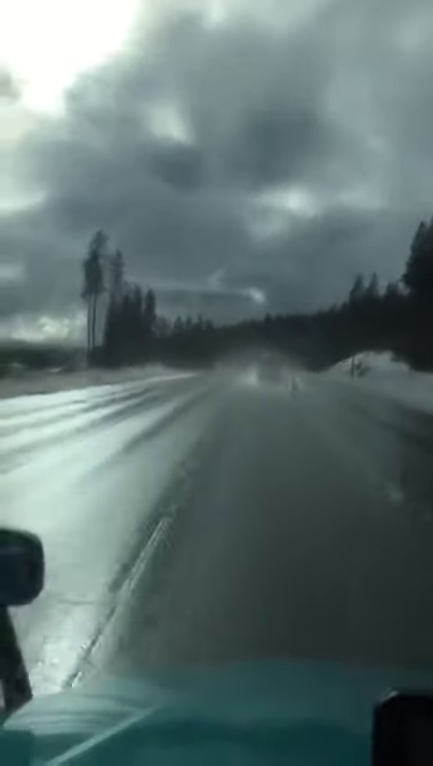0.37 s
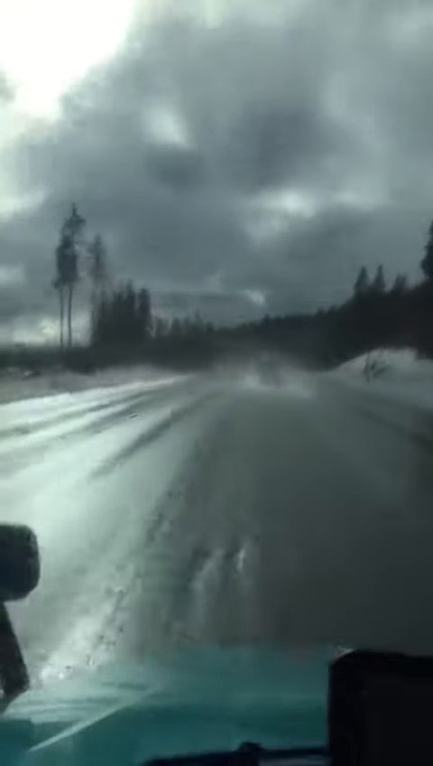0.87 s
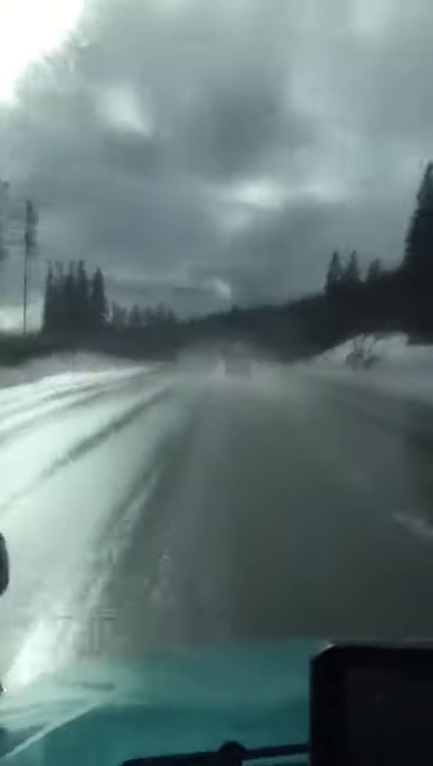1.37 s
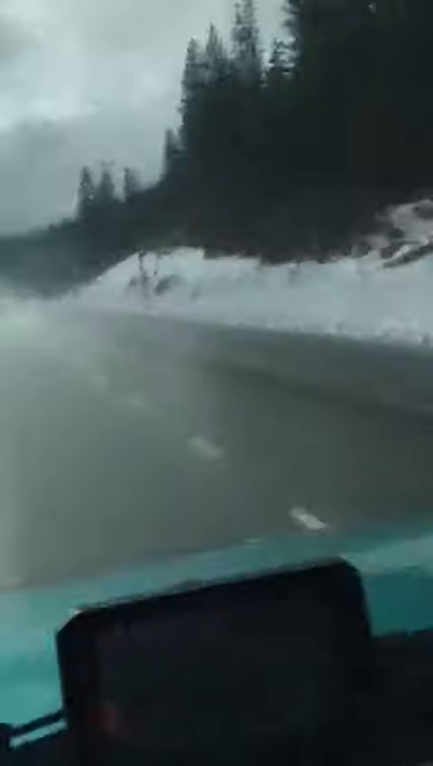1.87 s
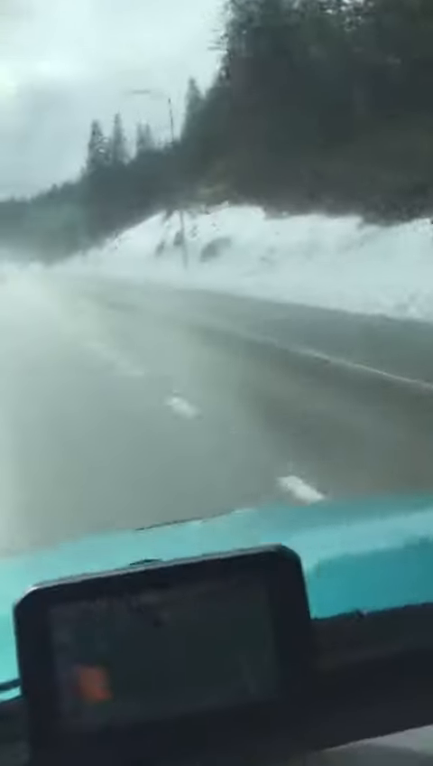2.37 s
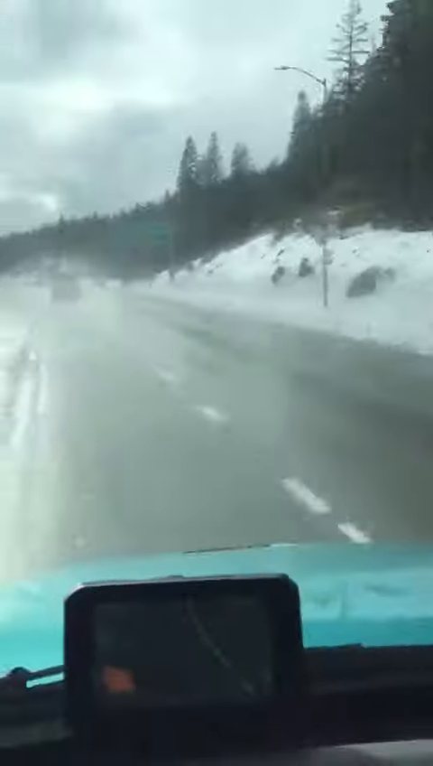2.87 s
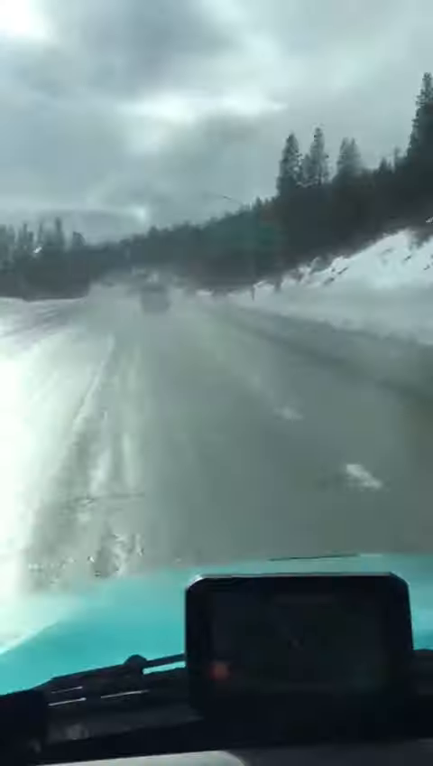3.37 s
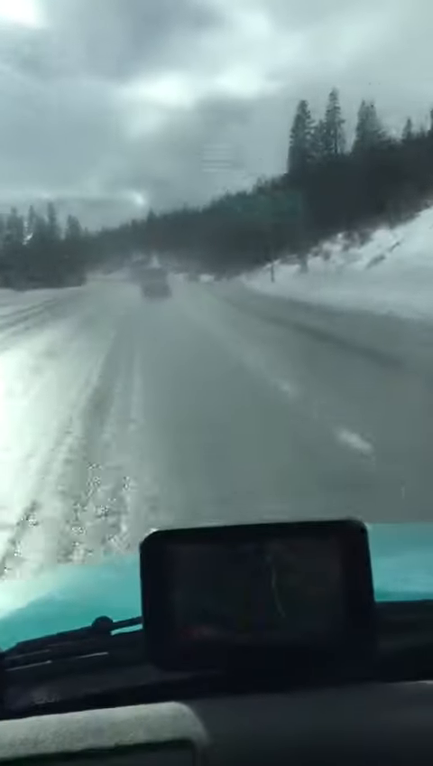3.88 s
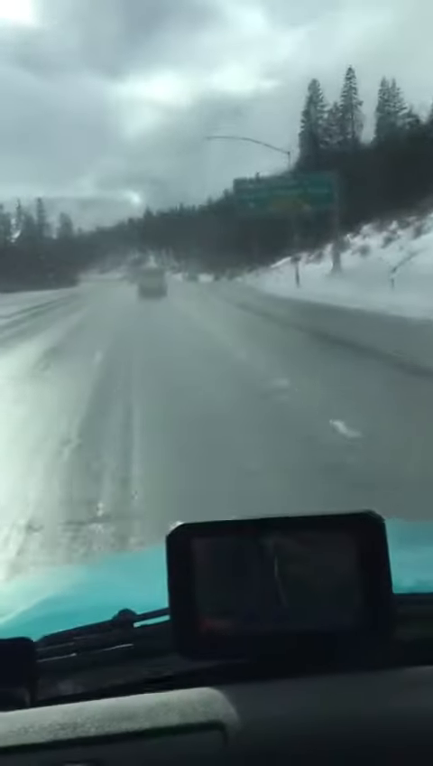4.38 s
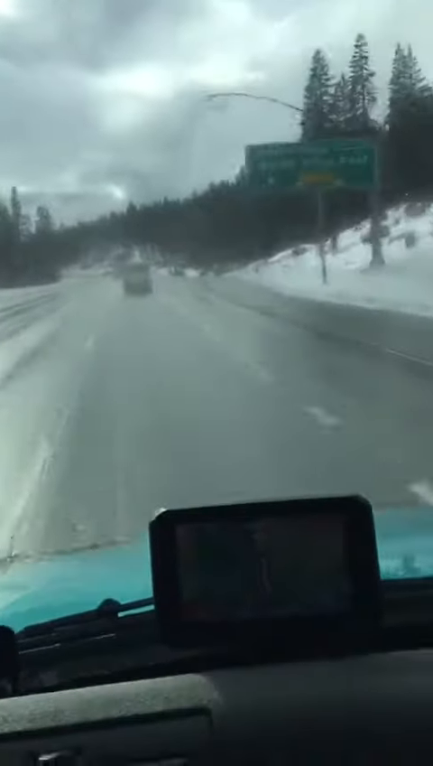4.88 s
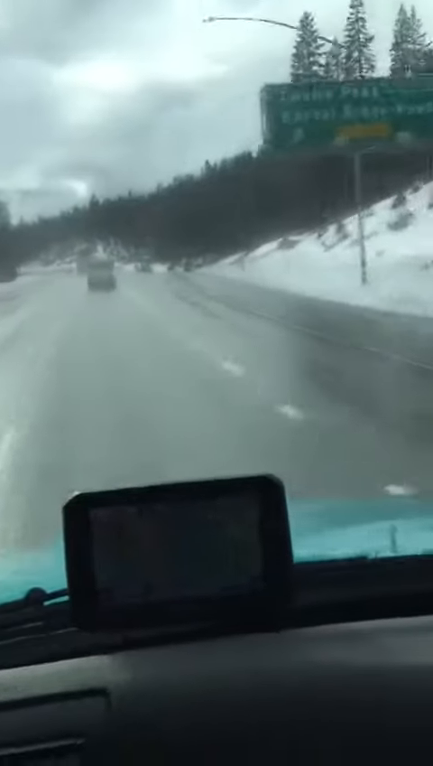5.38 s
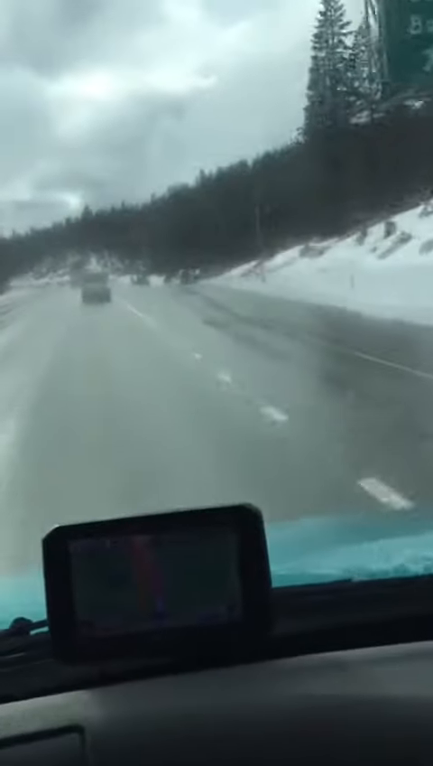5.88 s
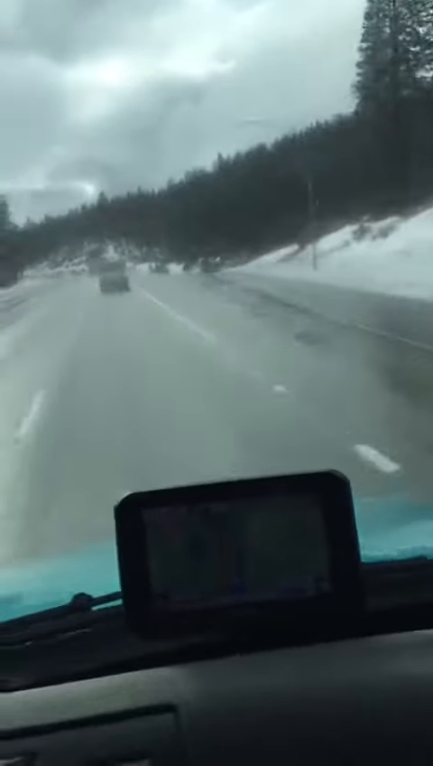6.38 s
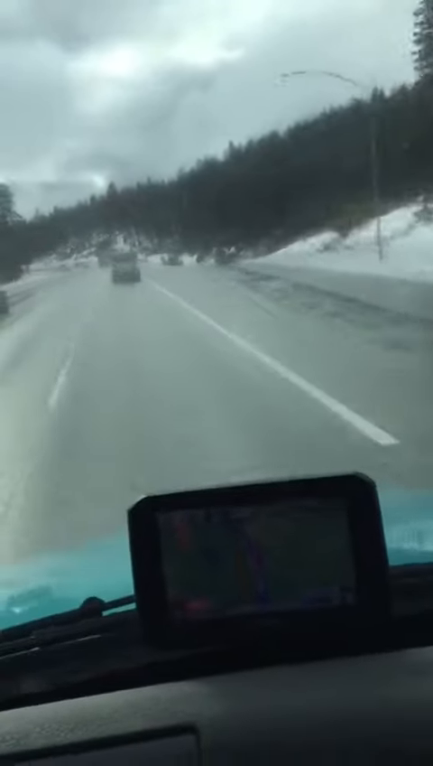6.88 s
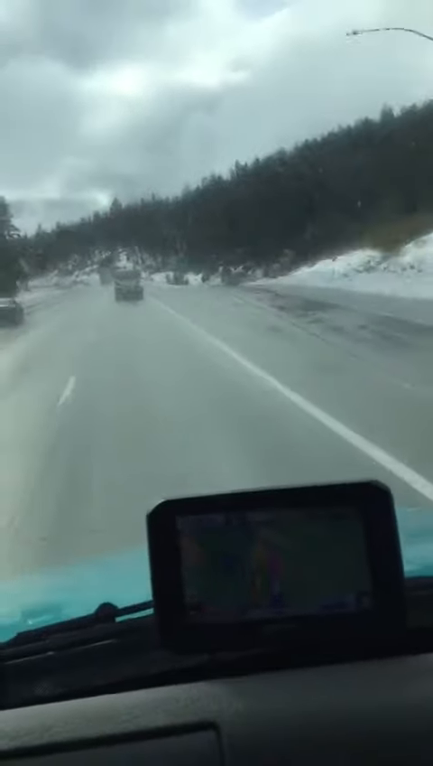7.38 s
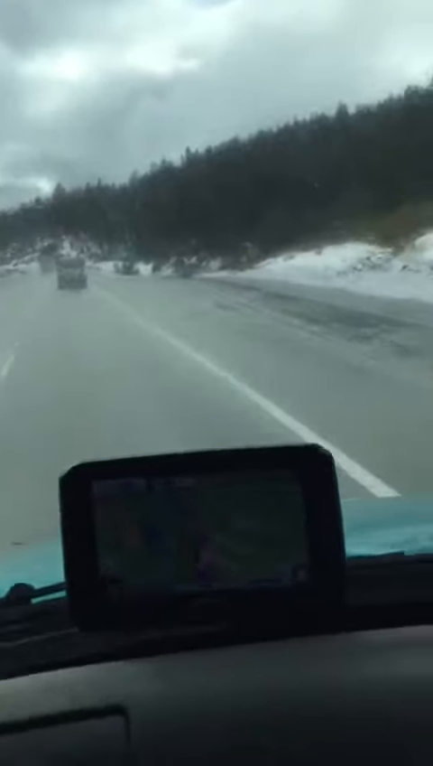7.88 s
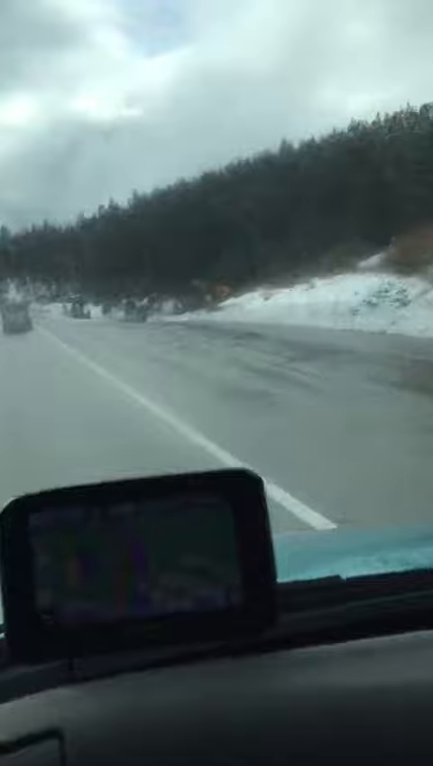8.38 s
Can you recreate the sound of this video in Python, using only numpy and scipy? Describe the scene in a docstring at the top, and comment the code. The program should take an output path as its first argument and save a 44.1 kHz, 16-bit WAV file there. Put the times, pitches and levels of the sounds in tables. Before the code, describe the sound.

Continuous cab noise while driving: deep air boom, panel rumble, floor drone and wet tyre roar, with low engine tones underneath. Light slush hisses and droplets speckle the treble. A sudden wash of spray comes first, then a rougher stretch with thumps, clicks and tiny metal rings, then a smoother one with faint tyre song and gear whine before the growl returns. Enclosed and dry, picked up in mono by a phone near the dashboard.

```python
"""Inside a truck cab on a wet highway: filtered noise booms and roars throughout, under wavering sine tones
from engine, tyres and a faint turbo; noise cracks tick in the trim and short sine grains speckle the treble.
A boom swell and a burst of slush pass at about 1.6 s. Near 4 s coarse asphalt growls, bumps swell the boom,
dull thuds come through the floor and metal parts ping as decaying sines.
After 6 s the growl sinks and the tyres sing, a gear whine rises at 7 s, and the growl returns at the end."""
import sys
import numpy as np
from scipy import signal
from scipy.fft import rfft, irfft, next_fast_len
from scipy.io import wavfile
from scipy.ndimage import uniform_filter1d, map_coordinates

SR = 44100
rng = np.random.default_rng(int(sys.argv[2]) if len(sys.argv) > 2 else 0)


def makeup_ratio(level_db):
    """Linear amplitude ratio for a level in decibels (20 dB per factor of ten)."""
    decades = np.asarray(level_db, float) / 20
    return 10 ** decades


def waveform_to_disk(signal):
    """Save audio, clipped to [-1, 1], as 16-bit WAV at the path in sys.argv[1]."""
    frames = np.transpose(np.atleast_2d(signal))
    scaled = np.clip(frames, -1, 1) * 32767
    samples = np.round(scaled).astype(np.int16)
    wavfile.write(sys.argv[1], SR, samples)


N = 385434

# slush thrown up by the wheels: t/s, spray level/dB
SPRAY_LEVEL = [(0, -49), (.7, -49), (.95, -46), (1.1, -50), (1.49, -45.5), (1.57, -34.5), (1.76, -36.5),
               (1.79, -44.5), (2.2, -45), (2.5, -48), (3.4, -49), (3.74, -47.5), (3.81, -41), (4.2, -45.5),
               (4.65, -41.5), (5.05, -45), (5.3, -49), (5.9, -49.5), (6.1, -44.5), (6.4, -50), (7.3, -48),
               (8.2, -49), (8.74, -47.5)]


def unit(x):
    """Scales x to rms 1."""
    return x / np.sqrt(np.mean(x ** 2) + 1e-20)


def curves(rows):
    """Draws one value per sample for each column after the time."""
    s, *columns = np.transpose(rows)
    t = np.arange(N) / SR
    return [np.interp(t, s, column) for column in columns]


def wobble(rate):
    """A smooth random curve with rate knots a second."""
    knots = rng.standard_normal(int(N * rate / SR) + 4)
    return map_coordinates(knots, [np.arange(N) * rate / SR])


def coloured(x, spectrum):
    """Filters x by a gain curve of (Hz, dB) points joined on a log frequency axis."""
    m = next_fast_len(N + 8192)
    hz, db = np.transpose(spectrum)
    bins = np.fft.rfftfreq(m, 1 / SR)
    gain = makeup_ratio(np.interp(np.log(bins + 1), np.log(hz + 1), db))
    return irfft(rfft(x, m) * gain, m)[..., :N]


def hiss(spectrum):
    """Smooth coloured noise of rms 1."""
    return unit(coloured(rng.standard_normal(N), spectrum))


def rush(spectrum, patchy_db):
    """Coloured noise of rms 1 whose gain varies in random patches of time and frequency."""
    z = signal.stft(rng.standard_normal(N), nperseg=512)[2]
    across_bins = uniform_filter1d(rng.standard_normal(z.shape), size=6, axis=0)
    patches = unit(uniform_filter1d(across_bins, size=12, axis=1))
    noise = signal.istft(z * makeup_ratio(patchy_db * patches), nperseg=512)[1][:N]
    return unit(coloured(noise, spectrum))


def tone(rows, waver_hz, flutter_db, rate):
    """A sine on a (s, Hz, rms dB) track, unsteady in pitch and level."""
    hz, db = curves(rows)
    phase = 2 * np.pi * np.cumsum(hz + waver_hz * wobble(rate)) / SR
    return np.sqrt(2) * makeup_ratio(db + flutter_db * wobble(rate)) * np.sin(phase)


def add(track, s, sound):
    """Mixes a short sound in at s seconds."""
    part = track[round(s * SR):][:len(sound)]
    part += sound[:len(part)]


def sine_grains(count=3000):
    """Short sine grains at random times and pitches, weaker toward the treble, louder with the spray."""
    when, pitch, size, life = rng.random((count, 4)).T
    start = (when * N).astype(int)
    hz = 1100 * (9500 / 1100) ** pitch
    spray_db = np.minimum(curves(SPRAY_LEVEL)[0][start], -41)
    db = spray_db - 8 - 6.5 * np.log2(hz / 2500) + 9 * size
    t = np.arange(SR // 30) / SR
    rise_s = 0.002 + 0.003 * life[:, None]
    envelope = t / rise_s * np.exp(1 - t / rise_s)  # peaks at 1 after rise_s
    grains = makeup_ratio(db)[:, None] * envelope * np.sin(2 * np.pi * hz[:, None] * t)
    places = start[:, None] + np.arange(len(t))
    return np.bincount(places.ravel(), grains.ravel())[:N]


def pings():
    """Small metal parts ring, each a decaying sine with a soft start."""
    # struck parts: t/s, level/dB, f/Hz
    struck = [(1.394, -31, 3000), (1.396, -44, 6600), (1.47, -49, 9400), (2.698, -49, 10000),
              (2.843, -45, 9900), (3.788, -29, 2440), (3.858, -37, 2900), (3.862, -31, 3190),
              (3.858, -37, 4370), (4.52, -37, 4150), (4.569, -26, 2410), (4.666, -30, 2450),
              (4.676, -32, 3250), (7.237, -36, 3930), (8.48, -36, 2910), (8.61, -39, 3000)]
    t60_s, rise_s = 0.075, 0.0018
    out, t = np.zeros(N), np.arange(SR // 4) / SR
    for s, db, hz in struck:
        envelope = makeup_ratio(db - 60 * t / t60_s) * (1 - np.exp(-t / rise_s))
        add(out, s, envelope * np.sin(2 * np.pi * hz * t))
    return out


def ticks(count=24):
    """Loose trim ticks: a short crack and a burst of noise dying in the cab, coloured by a duller knock."""
    # trim ticks: t/s, burst level/dB, knock level over the burst/dB
    placed = [(.1026, -35, -17), (.612, -47, 8), (.72, -45.5, 7), (.814, -47, -4), (.845, -36.5, -9),
              (1.3259, -42, -5), (1.393, -39.5, -8), (1.4686, -47, -7), (1.5658, -34, -5), (1.7993, -49, 0),
              (1.8981, -50, -10), (2.4054, -39, -18), (2.4943, -44.5, 7), (3.0619, -47, -11),
              (3.5843, -46, 0), (3.6576, -45, -5), (3.7883, -43, 3), (3.8535, -48.5, 16), (4.106, -41, 7.5),
              (4.2847, -45, 9), (4.305, -47, 9), (4.441, -39, 5), (4.4812, -43, 1), (4.5715, -50, 7),
              (4.6643, -37, -5), (4.7765, -46, -11), (4.8539, -42, 6), (5.0095, -44, 4), (5.1936, -50.5, 9),
              (5.657, -50, 5), (5.7843, -47, 5), (6.0816, -39.5, -8), (6.3345, -45, -1),
              (6.6079, -41.5, -3), (6.8538, -43, -11.5), (7.8082, -48, 6), (7.8695, -45, -5),
              (8.2177, -39.5, -8), (8.4791, -43, 6.5), (8.6103, -48, 3)]
    # colour of crack and burst: f/Hz, relative gain/dB
    snap_colour = [(400, -23.5), (1500, -10), (3000, 3.5), (5000, 2.5), (7000, 2.5), (9500, -3.5),
                   (12000, -12.5)]
    # colour of the knock: f/Hz, relative gain/dB
    knock_colour = [(700, -42.5), (1500, 6), (3000, 4), (4300, 1), (6000, -38)]
    t60_s, rise_s = 0.12, 0.0033
    crack_t60_s, crack_db = 0.0083, 4  # crack level is over the burst
    snap, knock, t = np.zeros(N), np.zeros(N), np.arange(SR // 4) / SR
    when, size, dull = rng.random((count, 3)).T
    faint_db = -50.5 - 4 * (2 * size - 1)
    faint = zip(when * N / SR, faint_db, 16 * dull - 6)  # small ticks that fall by chance
    fade = makeup_ratio(-60 * t / t60_s) * (1 - np.exp(-t / rise_s))
    crack = makeup_ratio(crack_db - 60 * t / crack_t60_s)
    for s, db, knock_db in [*placed, *faint]:
        add(snap, s, makeup_ratio(db) * (fade + crack))
        add(knock, s, makeup_ratio(db + knock_db) * fade)
    return snap * hiss(snap_colour) + knock * hiss(knock_colour)


def thuds():
    """Blows from the road: a firm push, a fast-dying sine, with a dull noise burst through the floor."""
    # blows: t/s, level/dB, burst t60/s
    hits = [(4.1145, -17.5, .06), (4.286, -20, .09), (4.4945, -19.5, .045), (7.23, -28, .05)]
    # colour of the burst: f/Hz, relative gain/dB
    dull_colour = [(250, -22), (450, 4), (600, -2), (1000, -8.5), (1800, -16), (2500, -37)]
    blows, t = np.zeros(N), np.arange(SR // 4) / SR
    noise = hiss(dull_colour)
    push = 1.6 * makeup_ratio(-60 * t / 0.02) * np.sin(2 * np.pi * 620 * t)  # t60 0.02 s
    for s, db, t60_s in hits:
        fade = makeup_ratio(-60 * t / t60_s) * (1 - np.exp(-t / 0.0017))
        burst = fade * noise[round(s * SR):][:len(t)]
        add(blows, s, makeup_ratio(db) * (push + burst))
    return blows


def engine_and_tyre_tones():
    """Unsteady sines: two low engine tones, tyre tread hum and song, gear whine and turbo whistle."""
    # lower engine tone: t/s, f/Hz, level/dB
    low_tone = [(0, 126, -28), (1.2, 124, -28.5), (1.7, 123, -36), (2.3, 124, -26), (3, 124, -29),
                (3.5, 124, -42), (8.74, 126, -42)]
    # upper engine tone: t/s, f/Hz, level/dB
    upper_tone = [(0, 193, -41), (2.6, 193, -42), (3.2, 193, -35), (3.7, 192, -41), (5.5, 192, -43),
                  (5.9, 191, -34), (6.3, 191, -43), (7.7, 192, -38), (8.3, 191, -31), (8.74, 191, -36)]
    # tread hum: t/s, f/Hz, level/dB
    tread = [(0, 304, -43), (1.7, 304, -44), (2.5, 305, -39), (3, 304, -43), (5.05, 301, -42),
             (5.3, 300, -35), (6.2, 297, -34), (6.7, 297, -43), (8, 299, -43), (8.4, 299, -39),
             (8.74, 299, -41)]
    # tyre song, strongest on a smoother stretch: t/s, f/Hz, level/dB
    song = [(0, 870, -48), (2.6, 880, -49), (3.4, 880, -56), (5.8, 880, -56), (6.1, 875, -41),
            (6.8, 885, -43), (7.2, 900, -47), (8.74, 900, -47)]
    # gear whine: t/s, f/Hz, level/dB
    gear = [(0, 1735, -60), (6.8, 1750, -59), (7.05, 1765, -51), (7.6, 1750, -50.5), (8.74, 1742, -52)]
    # turbo whistle that fades in and out: t/s, f/Hz, level/dB
    turbo = [(0, 8450, -73), (1, 8660, -73), (1.15, 8480, -73), (1.3, 8300, -88), (1.9, 8250, -80),
             (2.2, 8560, -69), (2.9, 8660, -73), (3.4, 8420, -73), (3.8, 8250, -75), (4, 8200, -90),
             (6.1, 8700, -90), (6.3, 8950, -77), (6.55, 9300, -73), (6.75, 9550, -73), (7, 8920, -72),
             (7.25, 8830, -73), (7.6, 8850, -70), (8.74, 8670, -73)]
    engine_tones = tone(low_tone, waver_hz=2.2, flutter_db=2.5, rate=10)
    engine_tones += tone(upper_tone, waver_hz=1.5, flutter_db=1.0, rate=5)
    tyres = tone(tread, waver_hz=3, flutter_db=2, rate=12)
    tyres += tone(song, waver_hz=45, flutter_db=3, rate=90)
    whine = tone(gear, waver_hz=16, flutter_db=0.5, rate=25)
    whistle = makeup_ratio(2.5 * wobble(5.5)) * tone(turbo, waver_hz=18, flutter_db=2, rate=45)
    return engine_tones + tyres + whine + whistle


def spray():
    """Slush hisses on the arches in clumps with single droplets; heavier spray is brighter and more even."""
    # colour of the slush: f/Hz, relative gain/dB
    slush_colour = [(400, -34.5), (900, 3), (1500, -6), (2760, -4), (6650, -17), (9500, -20.5),
                    (12000, -33.5)]
    # colour of the bright fizz: f/Hz, relative gain/dB
    fizz_colour = [(500, -29.5), (900, 10), (2000, 4), (3500, 3.5), (5500, 0), (8500, -1), (12000, -5)]
    light_db, steady_db = -45, -32.5  # clumps close up into a wash between these levels
    mean_db = curves(SPRAY_LEVEL)[0]
    uneven = np.clip((steady_db - mean_db) / (steady_db - light_db), 0, 1)
    spray_db = mean_db + uneven * 1.4 * wobble(9)
    clumps = makeup_ratio(uneven * 2.0 * wobble(20) + 1.5 * wobble(45))
    falls = rng.random(N) < 600 / SR  # about 600 droplets a second
    droplets = falls * makeup_ratio(4 * rng.standard_normal(N))
    slush = unit(clumps * rush(slush_colour, patchy_db=0.6))
    slush += 0.28 * unit(coloured(droplets, slush_colour))
    fizz_gain = makeup_ratio(2 * spray_db + 32)  # rises 2 dB for each dB of spray
    return makeup_ratio(spray_db) * slush + fizz_gain * clumps * hiss(fizz_colour)


def road():
    """Rough road booms the cab air and panels, drones in the floor, roars in the tyres and growls on asphalt."""
    # road noise: t/s, tyre roar level/dB, floor drone level/dB, coarse asphalt growl level/dB
    road_levels = [(0, -31, -24, -41), (1, -31, -23, -50), (2, -31, -23, -48), (2.7, -30.5, -23.5, -51),
                   (3.3, -32.5, -24, -39), (3.8, -30.5, -22, -39.5), (4.2, -33, -22.5, -37.5),
                   (4.6, -32, -22, -39), (5.2, -33, -24.5, -39.5), (5.8, -33.5, -27.5, -40.5),
                   (6.2, -30.5, -24, -56), (6.8, -32.5, -24, -46), (7.5, -32, -25.5, -47.5),
                   (8.2, -31.5, -24, -38.5), (8.74, -32.5, -23, -39)]
    # how hard the road surface shakes the cab: t/s, air boom level/dB
    rough = [(0, -27), (.5, -27), (1.1, -27.5), (1.5, -18), (1.85, -18), (2.05, -28.5), (2.7, -27),
             (3.7, -25.5), (3.95, -23.5), (4.4, -18.5), (4.85, -24.5), (5.1, -18.5), (5.45, -25),
             (6.4, -23.5), (6.9, -29.5), (7.5, -26.5), (8.2, -28), (8.74, -28.5)]
    # single bumps that swell the air boom: t/s, swell/dB
    bumps = [(3.82, 11), (4.06, 8.5), (4.36, 0)]
    # colours of air boom, panel boom, drone, roar and growl, each: f/Hz, relative gain/dB
    boom_colour = [(15, -52), (22, -23), (31, -7.5), (42, 7.5), (50, -0.5), (58, -6), (70, -27.5),
                   (120, -120)]
    panel_colour = [(35, -120), (50, -22), (60, -1.5), (71, 0), (85, -6), (97, -2.5), (112, -10),
                    (170, -16), (290, -120)]
    drone_colour = [(59, -34), (100, 0), (199, -2.5), (269, -7.5), (304, -13), (349, -17), (420, -25.5),
                    (550, -49), (920, -120)]
    roar_colour = [(190, -32), (330, -0.5), (423, -6.5), (560, -4), (600, -4.5), (655, 1), (700, -5),
                   (760, -5.5), (840, -4.5), (900, -6), (1020, -9), (1180, -10.5), (1740, -16.5),
                   (3700, -30), (6000, -35), (9000, -54), (12000, -56.5)]
    growl_colour = [(300, -59.5), (420, -9), (520, -2.5), (590, 1), (680, -18.5), (900, -59.5)]
    roar_db, drone_db, growl_db = curves(road_levels)
    rough_db = curves(rough)[0]
    t = np.arange(N) / SR
    swell_db = sum(db * np.exp(-((t - s) / 0.091) ** 2) for s, db in bumps)  # half width 0.091 s
    # the panels follow half of the swing of the air boom
    panel_db = -22.5 + 0.5 * (rough_db - rough_db.mean()) + 1.5 * wobble(4.4)
    air = makeup_ratio(rough_db + swell_db + 1.9 * wobble(6)) * hiss(boom_colour)
    panels = makeup_ratio(panel_db) * hiss(panel_colour)
    drone = makeup_ratio(drone_db + 1.26 * wobble(6.4)) * hiss(drone_colour)
    roar = makeup_ratio(roar_db + 0.44 * wobble(3.15)) * rush(roar_colour, patchy_db=1.32)
    growl = makeup_ratio(growl_db) * hiss(growl_colour)
    return air + panels + drone + roar + growl


def scene():
    """Sums all sources as heard from the dashboard, in one channel."""
    details = sine_grains() + pings() + ticks() + thuds()
    return (details + engine_and_tyre_tones() + spray() + road())[None]


def low_pass(x):
    """Removes everything above the highest recorded frequency."""
    return signal.sosfilt(signal.butter(12, 10860, fs=SR, output="sos"), x)


def record(dry):
    """A phone microphone dips twice in the treble; a steep filter closes the band above 10 kHz."""
    # microphone response, then the steep filter above 10 kHz: f/Hz, gain/dB
    response = [(4000, 0), (4900, -2), (5800, 0.5), (6900, -1.5), (7700, -5), (8600, -1), (9800, -1.5),
                (10250, -8), (10550, -20.5), (10800, -61.5)]
    mix = coloured(dry, response)
    return low_pass(mix)


dry = scene()
out = record(dry)
waveform_to_disk(out)
```